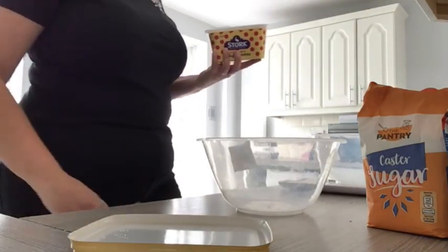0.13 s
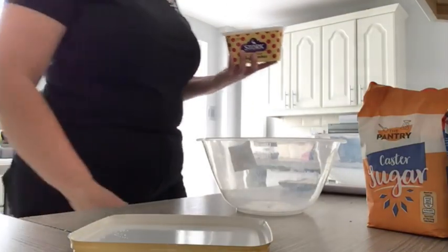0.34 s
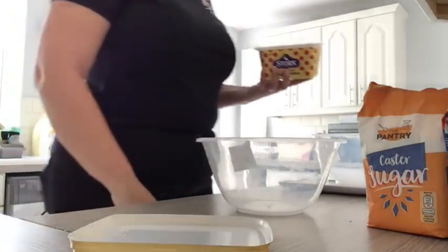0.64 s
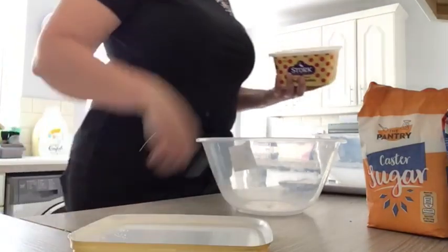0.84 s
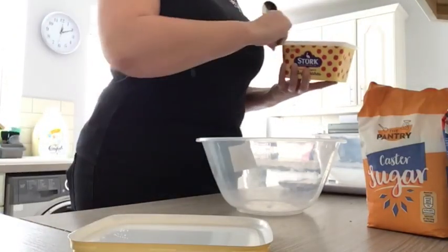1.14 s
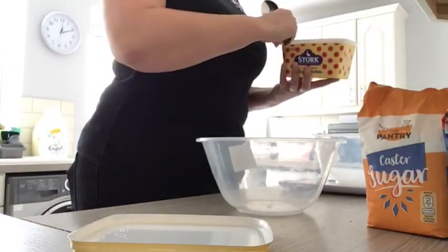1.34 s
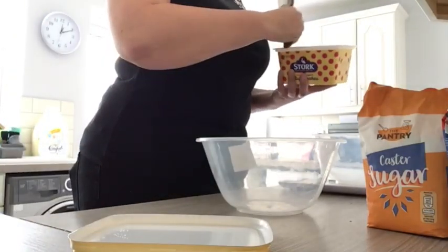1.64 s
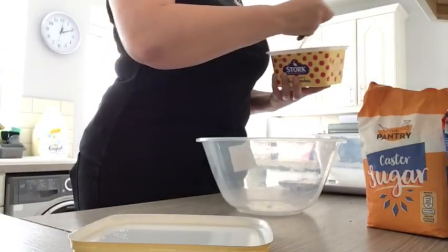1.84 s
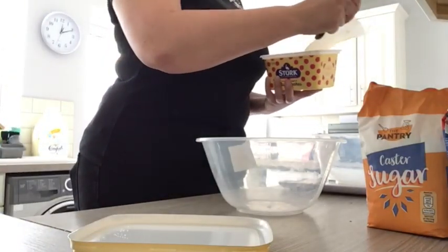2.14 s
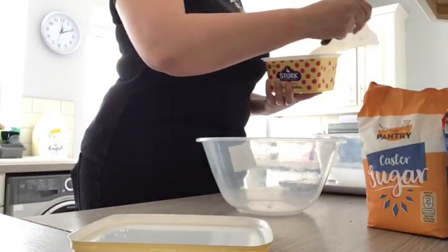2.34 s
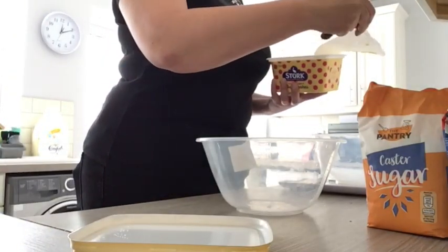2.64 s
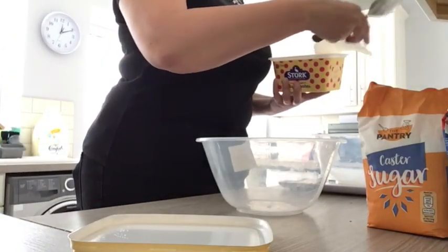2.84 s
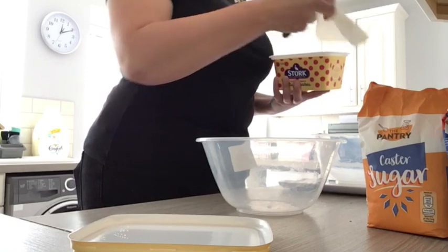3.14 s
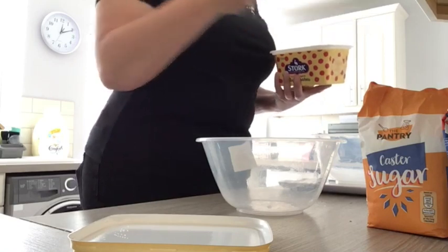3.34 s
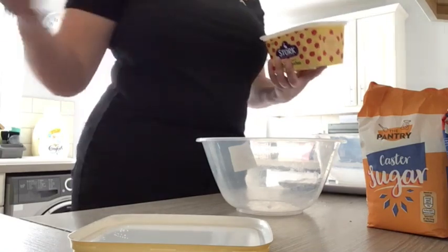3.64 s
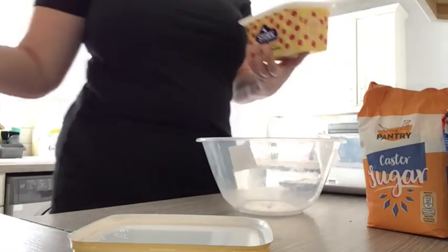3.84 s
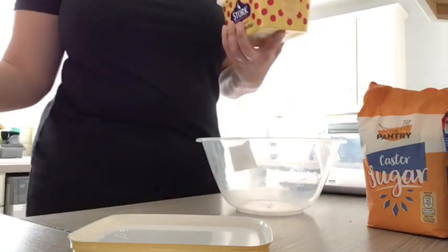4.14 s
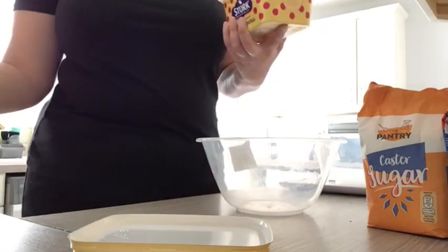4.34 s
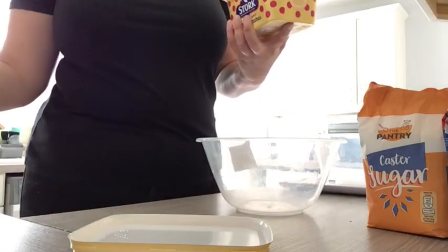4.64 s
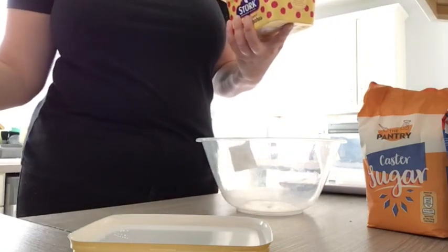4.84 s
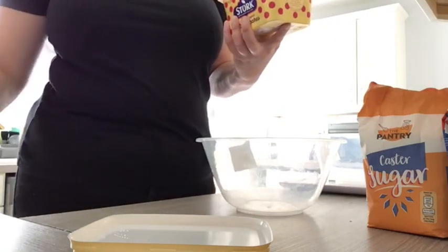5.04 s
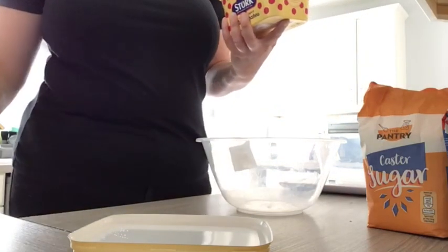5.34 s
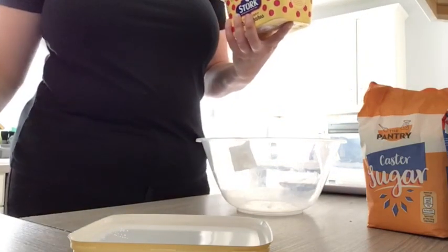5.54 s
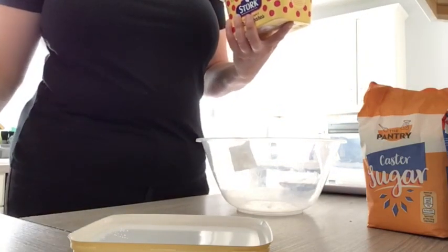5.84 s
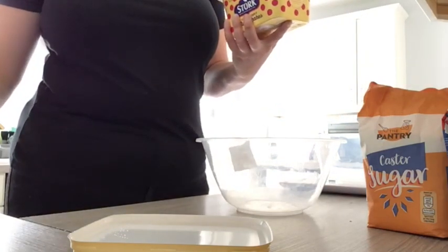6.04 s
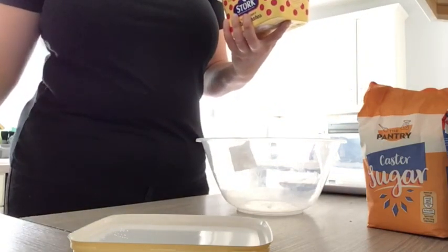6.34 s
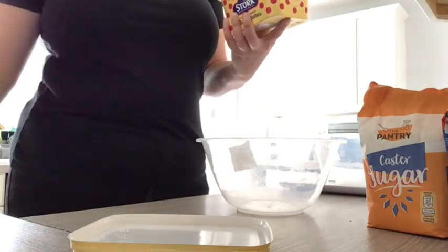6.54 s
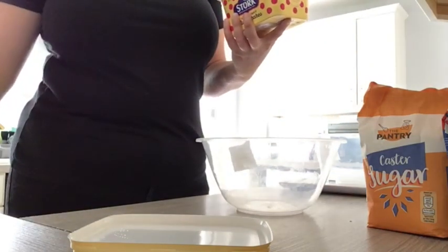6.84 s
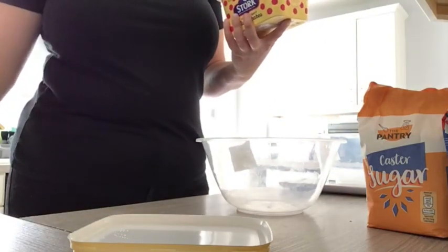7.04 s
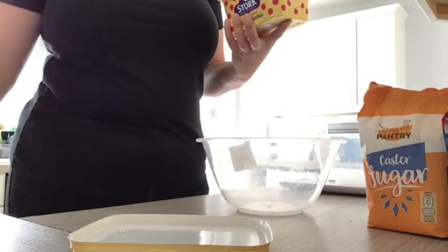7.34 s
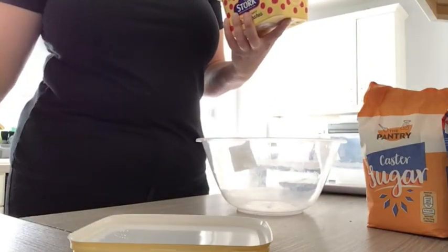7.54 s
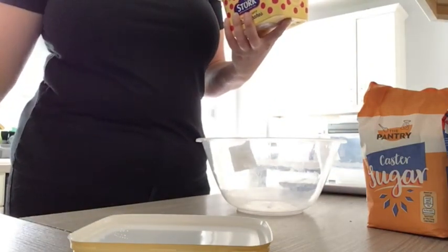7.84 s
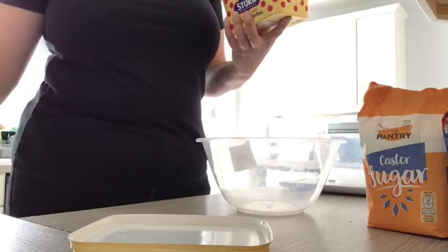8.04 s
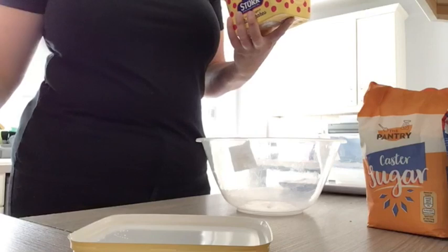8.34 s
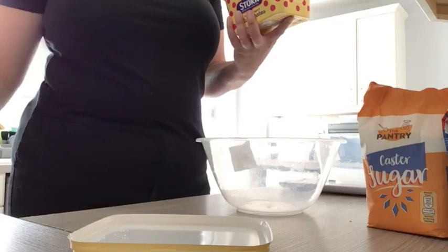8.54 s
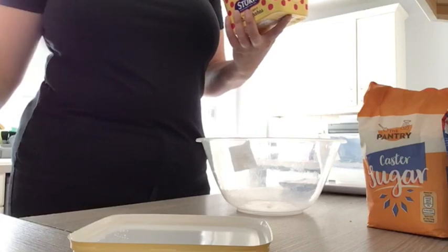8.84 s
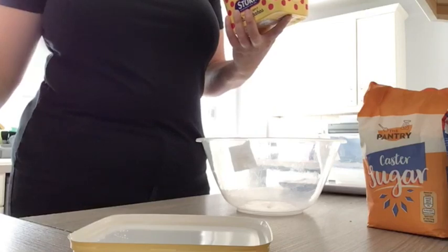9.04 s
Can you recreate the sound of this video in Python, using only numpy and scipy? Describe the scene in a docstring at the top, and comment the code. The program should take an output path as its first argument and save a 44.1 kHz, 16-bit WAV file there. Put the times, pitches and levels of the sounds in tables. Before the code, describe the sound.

Close pickup in a reflective home kitchen with faint low hum and room air. First a brief drawer roll, purring and clattering, ending in a clustered wooden thud. Next, dry crackles and crinkly peeling of a plastic film, brightest as it pulls taut, then duller and sparser. Finally three well-spaced hard plastic clicks with short ringing, quiet between them except very faint distant chirps.

```python
"""A fridge hums over faint room air throughout: wavering sines and coloured noise.
A drawer rolls with a rumble and purr (noise) amid brushing and rattles, then thuds shut (struck modes).
The seal of a plastic tub is peeled off, rustling, crackling and squeaking (slips, bursts, rings).
Cloth and a hand brush past (soft noise) and stiff plastic clicks three times, ringing (burst and modes).
The room is small and hard (diffuse tail); after the first click, a few faint chirps sound far off."""
import sys
import numpy as np
from scipy import signal
from scipy.fft import rfft, irfft, next_fast_len
from scipy.io import wavfile
from scipy.ndimage import uniform_filter1d

SR = 44100
rng = np.random.default_rng(int(sys.argv[2]) if len(sys.argv) > 2 else 0)


def materialize(psi):
    """Save the field psi as 16-bit PCM at rate SR to the path in sys.argv[1].

    A 1-D psi becomes a single channel; in a 2-D psi each row is a channel.
    """
    bounded = np.clip(np.atleast_2d(psi).T, -1, 1)
    quanta = np.round(bounded * 32767).astype(np.int16)
    wavfile.write(sys.argv[1], SR, quanta)


N = 405263
TIME = np.arange(N) / SR


def from_db(db):
    """Decibels to gain."""
    return 10 ** (np.asarray(db) / 20)


def rms_one(x):
    """Scale to unit power."""
    return x / np.sqrt(np.mean(x ** 2) + 1e-20)


def at_hz(points, hz):
    """Interpolate a table on a log-frequency axis."""
    freqs, values = np.transpose(points)
    return np.interp(np.log(np.maximum(hz, 1)), np.log(freqs), values)


def colour(x, spectrum):
    """Minimum-phase filter with the given (f/Hz, level/dB) response, via the folded cepstrum."""
    size = 2 * next_fast_len(len(x) // 2 + 2048)
    log_gain = np.log(from_db(at_hz(spectrum, np.fft.rfftfreq(size, 1 / SR))))
    cepstrum = irfft(log_gain)
    cepstrum[1:size // 2] *= 2
    cepstrum[size // 2 + 1:] = 0
    response = np.exp(rfft(cepstrum))
    return irfft(rfft(x, size) * response)[:len(x)]


def noise(spectrum):
    """Coloured noise of unit power."""
    return rms_one(colour(rng.standard_normal(N), spectrum))


def drift(per_s):
    """Random values joined by straight lines, unit power."""
    knots = rng.standard_normal(8192)
    return rms_one(np.interp(TIME * per_s, np.arange(len(knots)), knots))


def burst(t, t60_s, rise_s=0.00016):
    """Decaying noise of unit energy, its spectrum flattened."""
    x = rng.standard_normal(len(t)) * from_db(-60 * t / t60_s) * (1 - np.exp(-t / rise_s))
    power = uniform_filter1d(np.abs(rfft(x)) ** 2, size=len(t) // 200 + 1)
    inverse = np.column_stack([np.fft.rfftfreq(len(t), 1 / SR), -10 * np.log10(power)])
    even = colour(x, inverse[1:])  # skip 0 Hz
    return even / np.linalg.norm(even)


def ring(t, modes):
    """Decaying sines (f/Hz, level/dB, t60/s), neighbours in opposite sign."""
    total = 0
    for k, (hz, db, t60_s) in enumerate(modes):
        total = total + (-1) ** k * from_db(db - 60 * t / t60_s) * np.sin(2 * np.pi * hz * t)
    return total


def add(track, s, sound):
    """Mix a sound in at a time."""
    start = int(s * SR)
    track[start:start + len(sound)] += sound[:N - start]


def swell(s, db, rise_s, fall_s, hold_s=0):
    """Gain that peaks at s, holds and falls, by 20 dB in each rise or fall time."""
    away = np.maximum((s - TIME) / rise_s, (TIME - s - hold_s) / fall_s)
    return from_db(db - 20 * np.clip(away, 0, 10))


def strokes(rows):
    """Gain of a series of movements, added in power."""
    return np.sqrt(sum(swell(*row) ** 2 for row in rows))


# reverberation time: f/Hz, t60/s
ROOM_T60 = [(100, 0.31), (400, 0.55), (1200, 0.41), (3000, 0.42), (4500, 0.35), (7000, 0.36), (12000, 0.21)]


def kitchen(x, wet_db, build_s=0.0022):
    """Direct sound plus a diffuse tail that dies band by band."""
    t, tail = TIME[:SR * 3 // 4], 0
    edges_hz = np.geomspace(60, 15000, 13)
    for low, high in zip(edges_hz, edges_hz[1:]):
        band_pass = signal.butter(2, [low, high], "band", fs=SR, output="sos")
        band = signal.sosfilt(band_pass, rng.standard_normal(len(t)))
        tail = tail + band * from_db(-60 * t / at_hz(ROOM_T60, np.sqrt(low * high)))
    tail = tail * (1 - np.exp(-t / build_s))
    tail = tail / np.linalg.norm(tail)
    return x + from_db(wet_db) * signal.fftconvolve(x, tail)[:N]


# hum partials: multiple of HUM_HZ, mean level/dB
HUM = [(1, -50), (1.61, -65.5), (2, -69), (3.001, -75), (4, -77)]
HUM_HZ = 99.9


def fridge(waver_db=2.0, wander_rad=0.28):
    """A compressor hums at twice the mains rate, level and phase wavering a little."""
    phase = 2 * np.pi * HUM_HZ * TIME
    out = np.zeros(N)
    for k, db in HUM:
        gain = np.sqrt(2) * from_db(db + waver_db * drift(6.1))
        out += gain * np.sin(k * (phase + wander_rad * drift(7)))
    return out


# still-air spectrum: f/Hz, relative level/dB
AIR_COLOUR = [(25, -44.5), (45, -17), (60, -13), (80, -12.5), (125, -9), (160, -13), (350, -24), (580, -32),
              (1000, -39), (3000, -43), (9400, -53), (11500, -54.5), (12500, -74.5)]
AIR_DB = -57.5


def room_air():
    """The still room is steady coloured noise."""
    return from_db(AIR_DB) * noise(AIR_COLOUR)


# jolts on the runners: t/s, rumble level/dB before lumps
JOLTS = [(0.0, -32), (0.08, -28.5), (0.12, -34.5), (0.555, -37.5)]
# box rumble spectrum: f/Hz, relative level/dB
ROLL_COLOUR = [(26, -39), (45, -16), (113, 0.5), (157, 1.5), (183, -11.5), (221, -11), (292, -18),
               (373, -18.5), (564, -33), (1200, -38.5), (1560, -47), (2640, -120)]
# roller purr spectrum: f/Hz, relative level/dB
PURR_COLOUR = [(120, -31), (190, 2.5), (230, 5), (290, -3.5), (400, -14.5), (600, -27.5), (1200, -51.5)]
ROLL_END_S, ROLL_DB = 0.68, -42
PURR_FROM_S, PURR_TO_S, PURR_DB, SLOW_PURR_DB = 0.265, 0.41, -43.5, -52
ROLL_ATTACK_S, ROLL_RELEASE_S = 0.022, 0.16   # per 20 dB


def rolling(lumpy_db=3.5, jolt_fall_s=0.05):
    """The drawer's box rumbles, louder at each jolt; its rollers purr loudest midway, at full speed."""
    moving = swell(0, 0, ROLL_ATTACK_S, ROLL_RELEASE_S, ROLL_END_S)
    jolts = strokes([(s, db, ROLL_ATTACK_S, jolt_fall_s) for s, db in JOLTS])
    rumble = np.hypot(from_db(ROLL_DB) * moving, jolts) * from_db(lumpy_db * drift(40.1))
    fast = swell(PURR_FROM_S, PURR_DB, ROLL_ATTACK_S, ROLL_RELEASE_S, PURR_TO_S - PURR_FROM_S)
    purr = np.hypot(from_db(SLOW_PURR_DB) * moving, fast)
    return rumble * noise(ROLL_COLOUR) + purr * noise(PURR_COLOUR)


# cloth and hand strokes: peak t/s, level/dB before gain, rise/s and fall/s per 20 dB
BRUSHES = [(0.0, -52, 0.05, 0.2), (0.125, -54, 0.12, 0.21), (0.63, -58.5, 0.3, 0.34),
           (0.98, -54, 0.084, 0.095), (3.41, -54.5, 0.12, 0.14), (3.62, -50.5, 0.0058, 0.1),
           (6.26, -70, 0.08, 0.05)]
# brushing spectrum: f/Hz, relative level/dB
BRUSH_COLOUR = [(290, -34), (500, -3), (942, -7), (3040, 0), (3340, -6), (3770, -3.5), (5140, -9.5),
                (10900, -19), (12000, -28), (12500, -53), (16200, -74), (22000, -120)]


def brush(gain_db=-1, grain_db=1.5):
    """Cloth and skin slide with a soft, slightly grainy hiss."""
    return strokes(BRUSHES) * from_db(gain_db + grain_db * drift(140)) * noise(BRUSH_COLOUR)


# loose things in the drawer: t/s, level/dB before gain
RATTLES = [(0.0765, -26.5), (0.084, -45), (0.111, -30.5), (0.119, -49), (0.742, -35), (0.762, -29.5),
           (0.784, -35), (0.803, -32)]
# rattle spectrum: f/Hz, relative level/dB
RATTLE_COLOUR = [(400, -23), (900, -2), (1600, 7.5), (2400, 5.5), (4000, 3), (6500, -3), (11000, -11.5),
                 (12500, -26)]


def rattles(gain_db=12, t60_s=0.091):
    """The drawer's contents shift in brief clatters."""
    t, out = TIME[:SR // 4], np.zeros(N)
    for s, db in RATTLES:
        add(out, s, from_db(db + gain_db) * burst(t, t60_s))
    return colour(out, RATTLE_COLOUR)


# drawer meeting its stop: t/s, thud level/dB, contact/ms, knock level/dB before gain
THUDS = [(0.7431, -41, 0.7, -5), (0.7555, -12.5, 2.04, -3.5), (0.774, -8, 2.13, -5.5),
         (0.7904, -9.5, 2.9, -14), (0.834, -41, 4.9, -12)]
# drawer and worktop modes: f/Hz, level/dB, t60/s
CABINET = [(47.3, -37, 1), (63, -25, 0.16), (120.4, 1, 0.12), (152, -8, 0.26), (213.5, -3.5, 0.18),
           (289.5, -8.5, 0.18), (341, -5, 0.23), (373.3, -7, 0.21), (502, -10.5, 0.3), (597, -17, .2)]
# woody knock spectrum: f/Hz, relative level/dB
KNOCK_COLOUR = [(60, 1), (150, 7), (340, 4), (480, -6), (750, -10), (1000, -18), (1600, -20), (2500, -21.5),
                (5000, -43.5)]


def drawer(knock_gain_db=19, knock_t60_s=0.14):
    """The drawer bumps home in a few contacts, each a soft push on the modes and a woody knock."""
    t, out = TIME[:SR // 2], np.zeros(N)
    body = ring(t, CABINET)
    for s, db, contact_ms, knock_db in THUDS:
        push = np.exp(-t * 2e3 / contact_ms) * t
        thud = signal.fftconvolve(body, push / push.sum())[:len(t)]
        knock = colour(burst(t, knock_t60_s), KNOCK_COLOUR)
        add(out, s, from_db(db) * thud)
        add(out, s, from_db(knock_db + knock_gain_db) * knock)
    return out


# pulls on the seal: peak t/s, level/dB before gain, rise/s and fall/s per 20 dB
PULLS = [(1.42, -65.5, 0.08, 0.08), (1.87, -52.5, 0.19, 0.053), (2.03, -51, 0.22, 0.43),
         (2.345, -54.5, 0.03, 0.11), (3.058, -49, 0.1, 0.076), (4.41, -57.5, 0.06, 0.068),
         (4.78, -65.5, 0.29, 0.41)]
# peeling spectrum: f/Hz, relative level/dB
PEEL_COLOUR = [(180, -42), (300, 10.5), (635, -1), (867, -3), (1010, -9), (2790, -1.5), (3480, -5.5),
               (4060, -2), (6290, -7), (10900, -7.5), (11600, -5), (12500, -49), (16200, -38),
               (22000, -120)]


def peel(slips_per_s=1500, spread_db=4, clump_db=3.0, gain_db=-1):
    """The seal lets go in countless clumped slips, each ringing a small patch for a few cycles."""
    sizes = from_db(spread_db * np.minimum(rng.exponential(1, N), 3)) * rng.choice([-1, 1], N)
    slips = sizes * (rng.random(N) < slips_per_s / SR) * from_db(clump_db * drift(90))
    pitches_hz = np.geomspace(600, 12000, 16)
    odds = pitches_hz ** .5 / np.sum(pitches_hz ** .5)
    patch_hz, rustle = rng.choice(pitches_hz, N, p=odds), 0
    for hz in pitches_hz:
        hits = slips * (patch_hz == hz) + 1e-18
        rustle = rustle + signal.lfilter(*signal.iirpeak(hz, 3, fs=SR), hits) / hz ** .25
    return strokes(PULLS) * from_db(gain_db) * rms_one(colour(rustle, PEEL_COLOUR))


# larger creases flipping: t/s, level/dB and low pop level/dB before gains
CREASES = [(1.655, -40, -59), (1.7424, -45.5, -52), (1.77, -39.5, -51), (1.8424, -48, -68),
           (1.855, -38, -72), (1.9322, -26, -47), (2.0281, -24, -69), (2.0464, -30.5, -30.5),
           (2.0747, -30, -31.5), (2.0917, -23.5, -55), (2.1226, -28.5, -59), (2.2389, -33.5, -68),
           (2.2838, -31.5, -60), (2.34, -30, -47), (2.7916, -35.5, -46), (2.9618, -40, -44),
           (3.0204, -37.5, -47), (3.057, -32, -48), (3.1943, -38.5, -58), (3.612, -50, -42),
           (4.073, -41, -50), (4.397, -54, -68), (4.6981, -44, -51), (4.9414, -51, -60)]
# crease spectrum: f/Hz, relative level/dB
CREASE_COLOUR = [(400, -18), (900, -9.5), (1400, -5.5), (2100, -1), (3100, 4), (4200, 2.5), (7000, -0.5),
                 (11000, 0.5), (13000, -10)]
# seal comes free and slack; treble before gain
FREE_S, TAUT_TREBLE_DB, SLACK_TREBLE_DB = 2.5, -9.5, -16


def creases(gain_db=12, t60_s=0.043, treble_db=11, pop_db=22, patch_db=-31, patch_t60_s=0.019, count=12):
    """Each crease flips with a dry tick and rings its patch of the sheet; taut is bright, slack duller."""
    t, out = TIME[:SR // 8], np.zeros(N)
    for s, db, low_db in CREASES:
        patch = [(hz, patch_db, patch_t60_s) for hz in rng.uniform(1828, 11590, count)]
        high_db = db + (TAUT_TREBLE_DB if s < FREE_S else SLACK_TREBLE_DB)
        tint = [(950, low_db + pop_db), (1900, db), (4000, db), (8000, high_db + treble_db)]
        flip = burst(t, t60_s) + ring(t, patch)
        add(out, s, from_db(gain_db) * colour(flip, tint))
    return colour(out, CREASE_COLOUR)


# squeaks of the seal; the last row a light touch ringing the tub's rim: t/s, level/dB, f/Hz, swell/s
SQUEAKS = [(1.842, -46, 3020, 0.0043), (1.935, -43, 2750, 0.0021), (1.968, -44.5, 2900, 0.0017),
           (2.812, -56, 2200, 0.0021), (3.054, -46.5, 4500, 0.0032), (4.700, -56, 1980, 0.0018),
           (8.474, -56, 4605, 0.0094)]


def squeaks_and_touch(ring_share=4):
    """Rubbing (noise) rings one patch of plastic; a longer swell gives a purer note."""
    t, out = TIME[:SR // 5], np.zeros(N)
    for s, db, hz, swell_s in SQUEAKS:
        patch = ring(t, [(hz, 0, ring_share * swell_s)])
        rubbed = signal.fftconvolve(rng.standard_normal(len(t)), patch)[:len(t)]
        envelope = t / swell_s * np.exp(1 - t / swell_s)
        add(out, s, from_db(db) * rms_one(rubbed) * envelope)
    return out


# plastic snapping: t/s, then level/dB of whole, crack (before gain), wall, rim knock, rim ring,
# treble, hollow (all but the first relative)
SNAPS = [(4.115, -26, -1.5, 5.5, -10.5, -34, -2, -24.5), (5.8175, -22.5, -2.5, -0.5, 12, -20.5, 0.5, -17),
         (8.3839, -18.5, -3, 3, 4, -32, -10.5, -19)]
# tub wall modes: f/Hz, level/dB, t60/s
TUB = [(1130, -16, .03), (1380, -16, .02), (1670, -6.5, .02), (1966, -12, .03), (2330, -9, .025),
       (2448, -8, .035), (2597, -8, .03), (2820, -9, .018), (2945, -12, .03), (3250, -11, .03),
       (3510, -12, .02), (3995, -6, .02), (4165, -9, .025), (5330, -15, .025), (6500, -13, .03),
       (7690, -17, .04), (8900, -14, .035), (11000, -20, .03)]
# crack spectrum: f/Hz, relative level/dB
CRACK_COLOUR = [(300, -7), (770, -6), (920, -17.5), (1130, -4.5), (1450, -10.5), (1680, -3.5), (2080, -2.5),
                (2600, 6.5), (4200, -3), (5500, -4.5), (9000, -9.5), (12500, -12)]
# stiff rim modes: f/Hz, level/dB, t60/s
RIM = [(4130, -9, .22), (3790, -14.5, 0.29), (4300, -8, 0.14), (4235, -5, 0.4), (4500, -17, .38),
       (4605, -23, 0.49)]
# modes of the hollow behind the walls: f/Hz, level/dB, t60/s
HOLLOW = [(111.4, -4, 0.9), (238, 4, 0.1)]
WALL_HZ, RIM_HZ = 1620, 4120


def snaps(crack_gain_db=26, crack_t60_s=0.051, hollow_lag_s=0.0055, width=1.24):
    """Stiff plastic snaps through: a crack, the ringing walls and rim, then the hollow behind them."""
    t, out = TIME[:SR // 2], np.zeros(N)
    for s, db, crack_db, wall_db, knock_db, ring_db, treble_db, hollow_db in SNAPS:
        crack = colour(burst(t, crack_t60_s, rise_s=0.0017), CRACK_COLOUR)
        snap = ring(t, TUB) + from_db(crack_db + crack_gain_db) * crack
        wall = [(WALL_HZ / width ** 2, 0), (WALL_HZ, wall_db), (WALL_HZ * width, 0)]
        rim = [(RIM_HZ / width, 0), (RIM_HZ, knock_db), (RIM_HZ * width, 0)]
        tinted = colour(snap, wall + rim + [(9000, treble_db)])
        add(out, s, from_db(db) * (tinted + from_db(ring_db) * ring(t, RIM)))
        add(out, s + hollow_lag_s, from_db(db + hollow_db) * ring(t, HOLLOW))
    return out


# far-off chirps: t/s, length/s, start f/Hz, end f/Hz, level/dB
CHIRPS = [(4.942, 0.14, 5800, 5550, -77), (8.06, 0.081, 5900, 5820, -80), (8.15, .06, 5140, 5150, -81)]


def chirps(waver_hz=45):
    """Thin whistles, gliding slightly and wavering in pitch."""
    out = np.zeros(N)
    for s, length_s, start_hz, end_hz, db in CHIRPS:
        n = int(length_s * SR)
        pitch_hz = np.linspace(start_hz, end_hz, n) + waver_hz * drift(180)[:n]
        tone = np.sin(2 * np.pi * np.cumsum(pitch_hz) / SR)
        add(out, s, from_db(db) * signal.windows.tukey(n) * tone)
    return out


def scene():
    """Drawer, seal and tub in the kitchen, over hum, chirps and room air."""
    background = fridge() + room_air() + chirps()
    cupboard = kitchen(rolling() + drawer(), wet_db=-13.5)
    loose = kitchen(brush() + rattles(), wet_db=-7.5)
    seal = kitchen(peel() + creases() + squeaks_and_touch(), wet_db=-6.0)
    tub = kitchen(snaps(), wet_db=-11.5)
    return (background + cupboard + loose + seal + tub)[None]


CUTOFF_HZ = 12000


def record(dry):
    """The microphone drops the deepest bass; the top is cut steeply."""
    high_pass = signal.butter(6, 39, "high", fs=SR, output="sos")
    low_pass = signal.ellip(8, .2, 70, CUTOFF_HZ, fs=SR, output="sos")
    return signal.sosfilt(low_pass, signal.sosfilt(high_pass, dry))


dry = scene()
out = record(dry)
materialize(out)
```